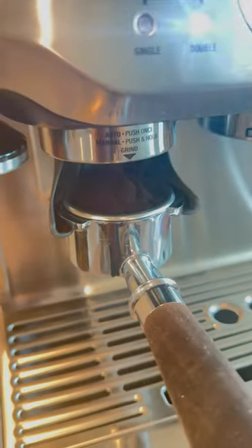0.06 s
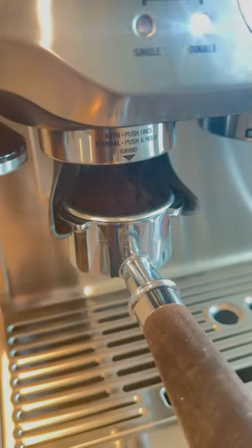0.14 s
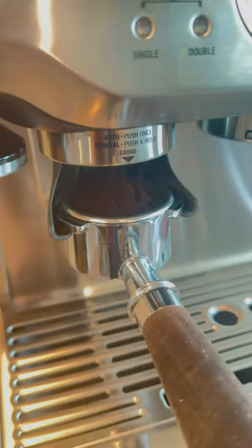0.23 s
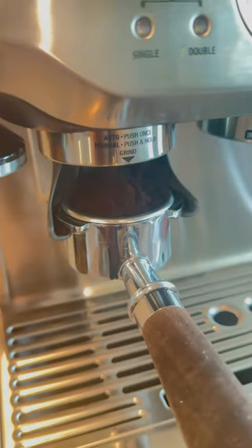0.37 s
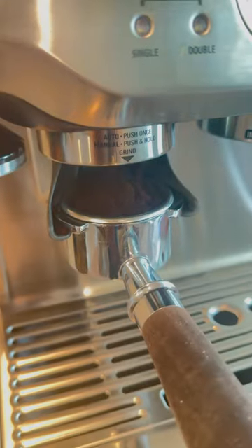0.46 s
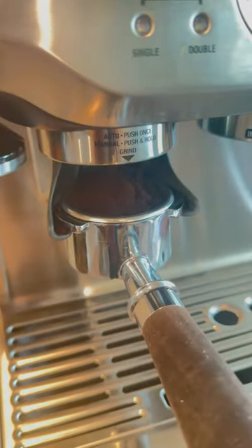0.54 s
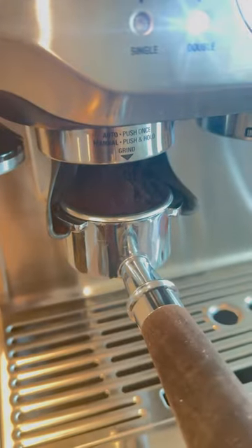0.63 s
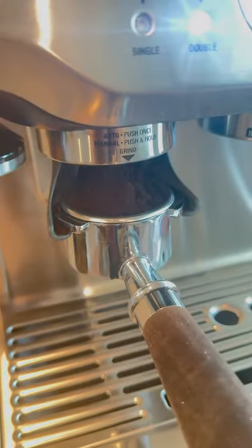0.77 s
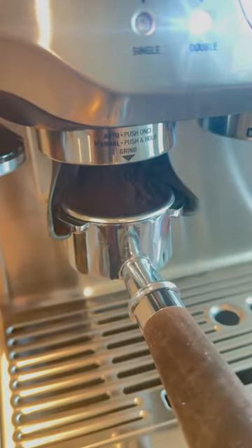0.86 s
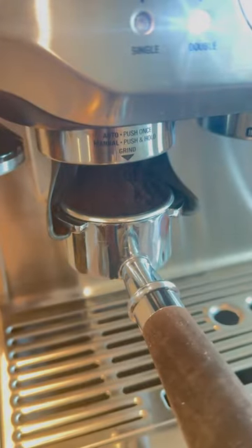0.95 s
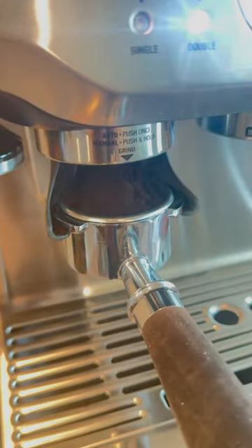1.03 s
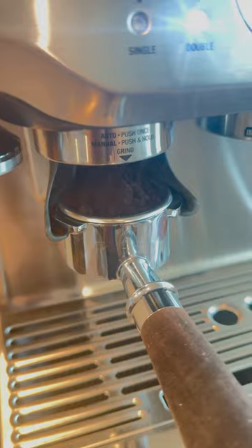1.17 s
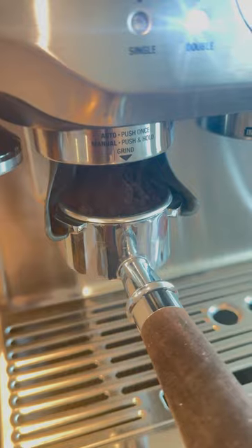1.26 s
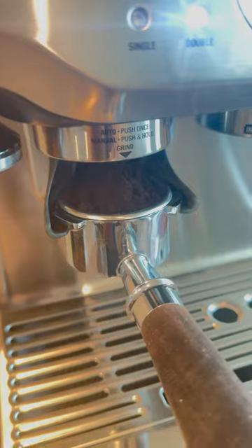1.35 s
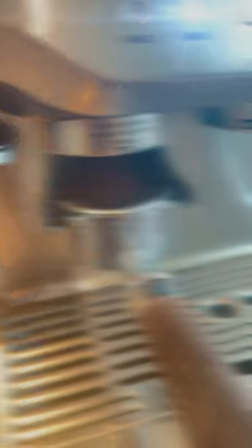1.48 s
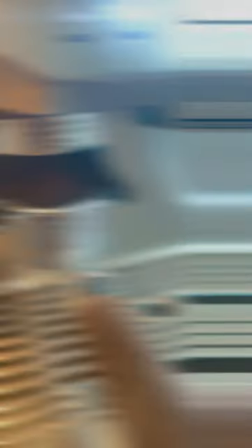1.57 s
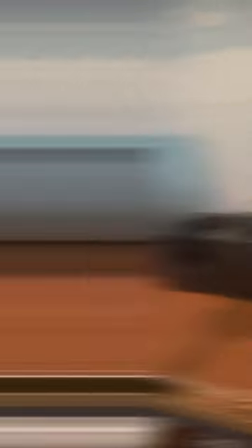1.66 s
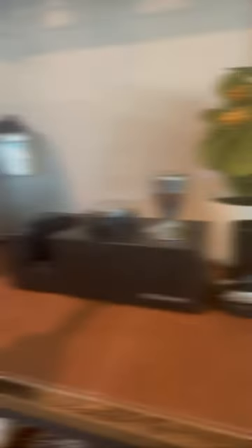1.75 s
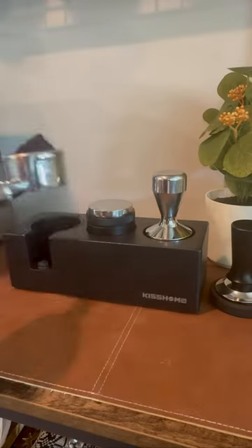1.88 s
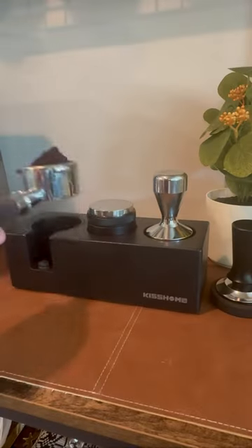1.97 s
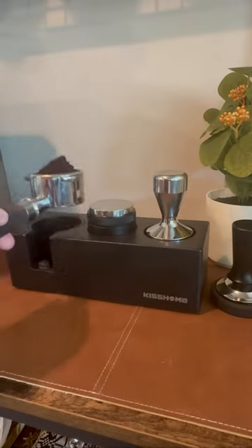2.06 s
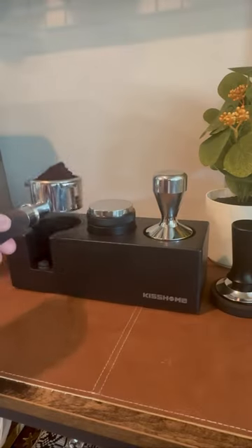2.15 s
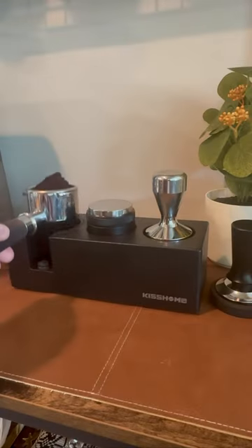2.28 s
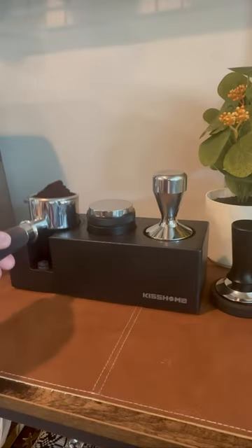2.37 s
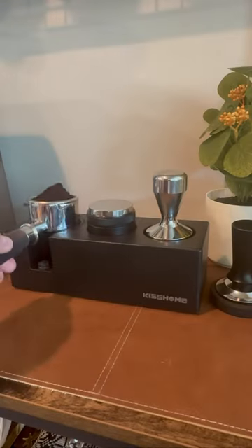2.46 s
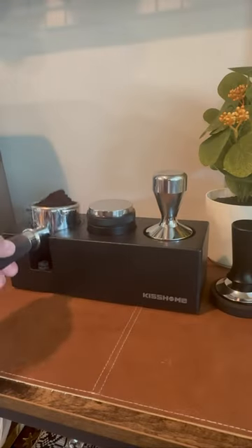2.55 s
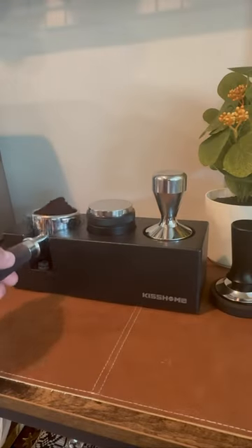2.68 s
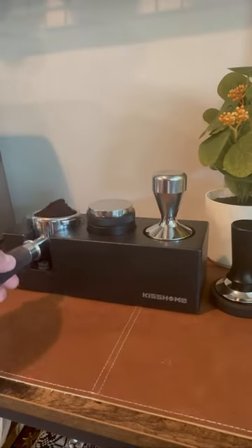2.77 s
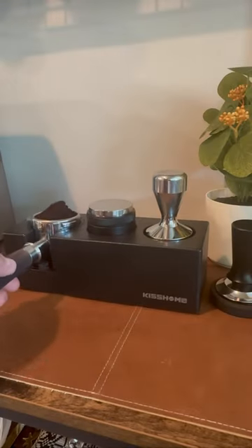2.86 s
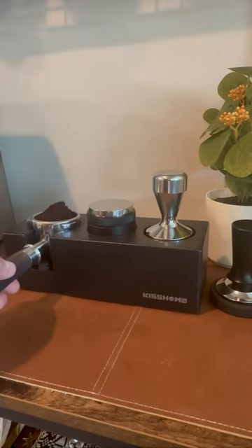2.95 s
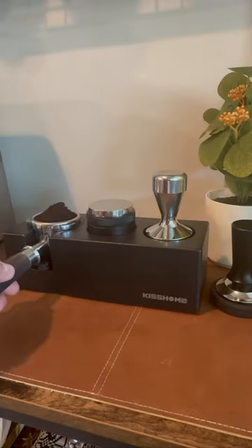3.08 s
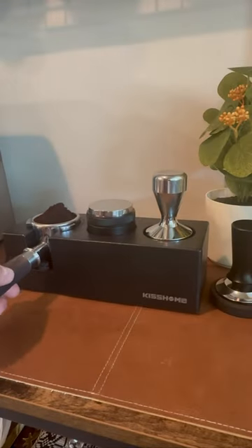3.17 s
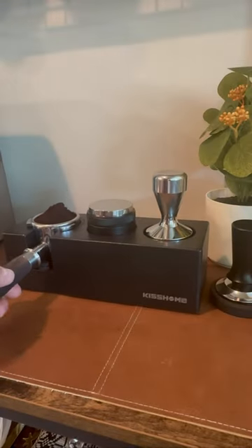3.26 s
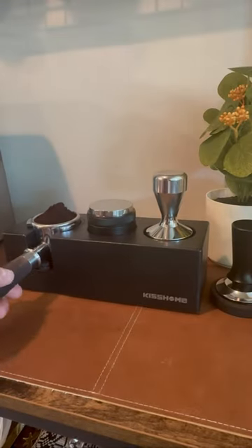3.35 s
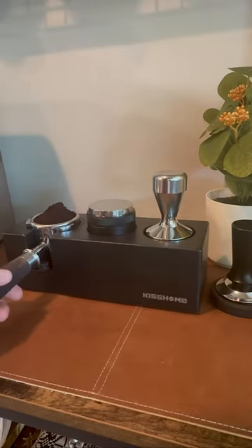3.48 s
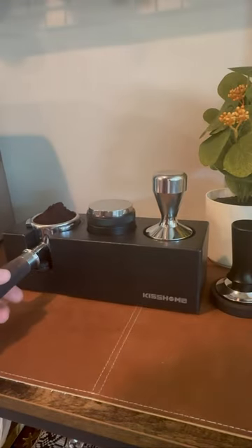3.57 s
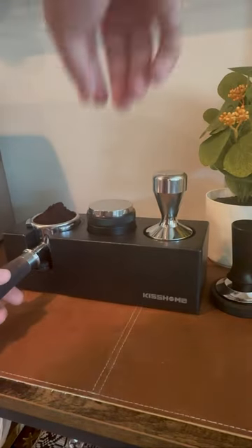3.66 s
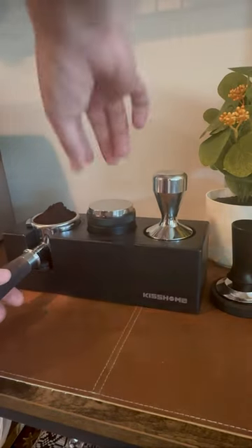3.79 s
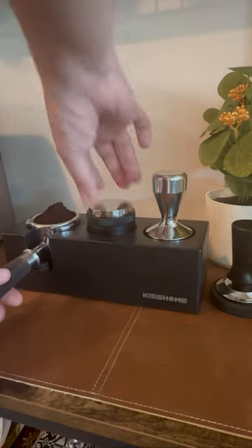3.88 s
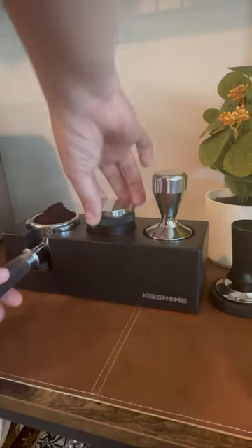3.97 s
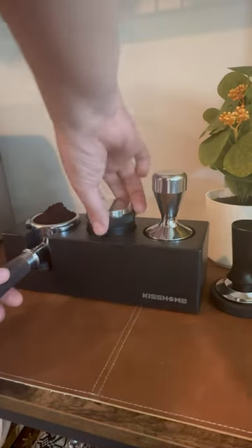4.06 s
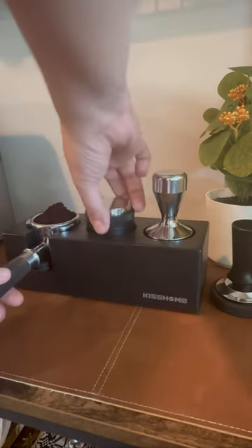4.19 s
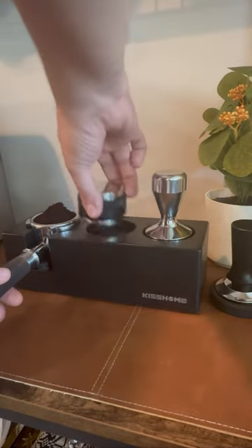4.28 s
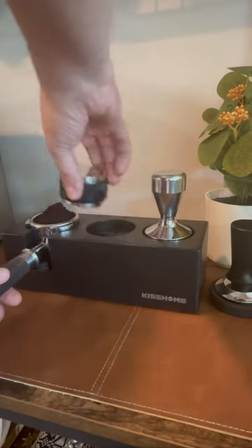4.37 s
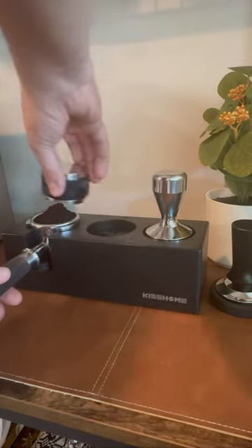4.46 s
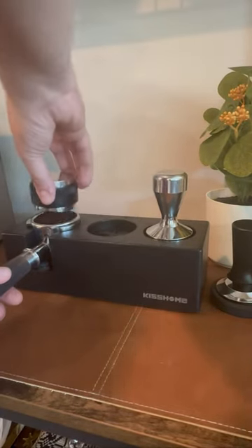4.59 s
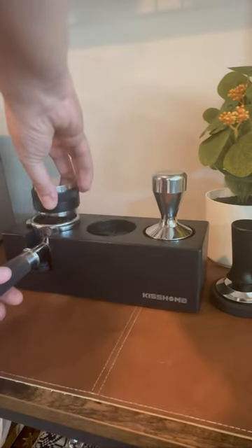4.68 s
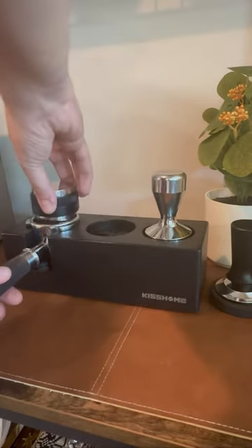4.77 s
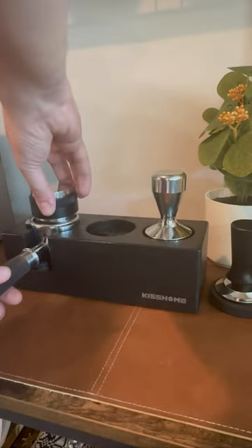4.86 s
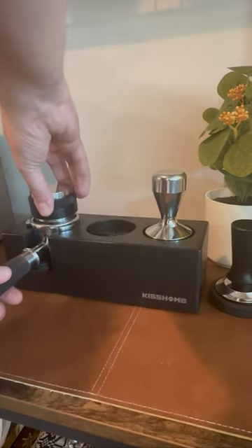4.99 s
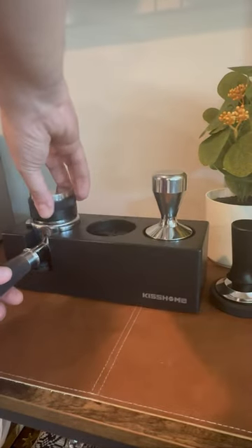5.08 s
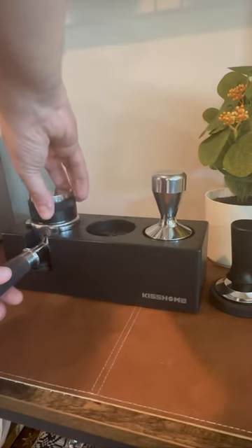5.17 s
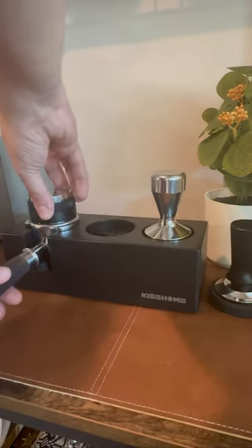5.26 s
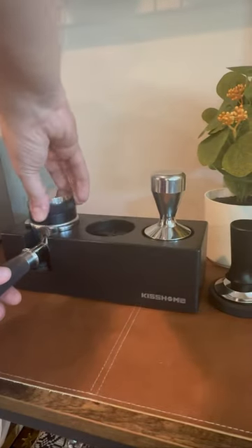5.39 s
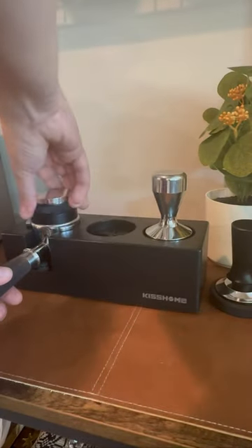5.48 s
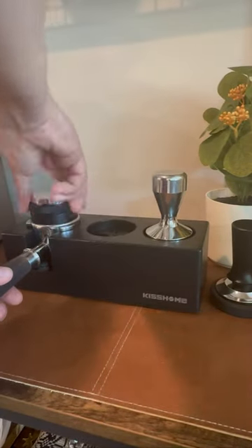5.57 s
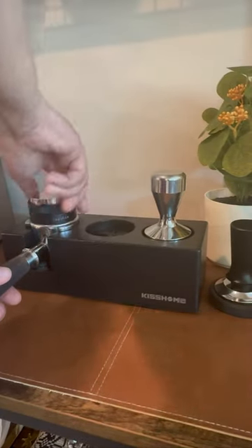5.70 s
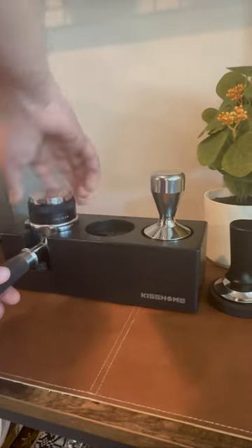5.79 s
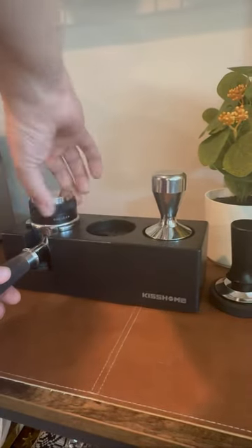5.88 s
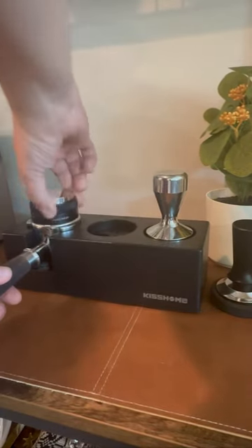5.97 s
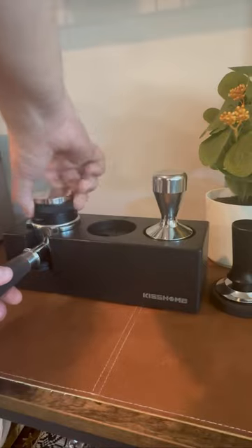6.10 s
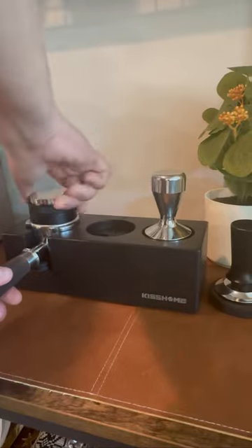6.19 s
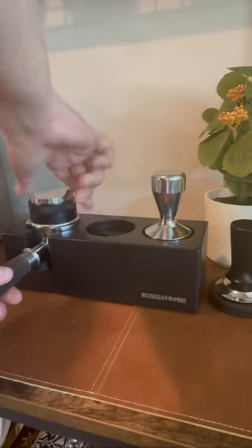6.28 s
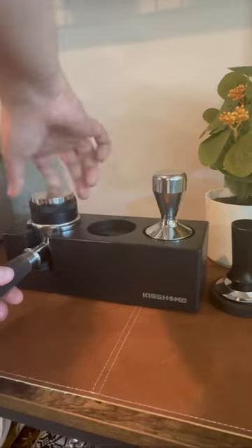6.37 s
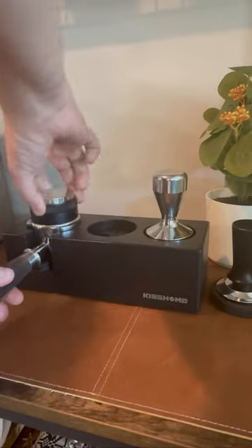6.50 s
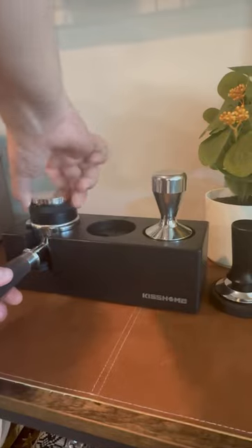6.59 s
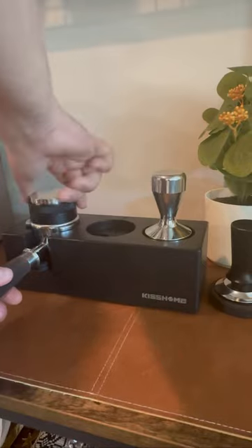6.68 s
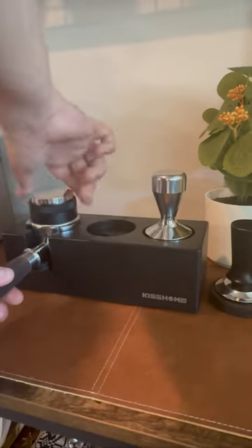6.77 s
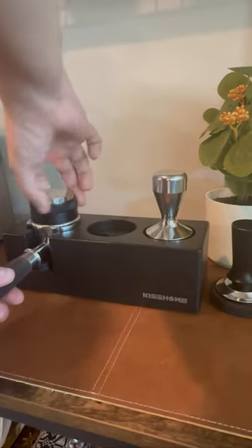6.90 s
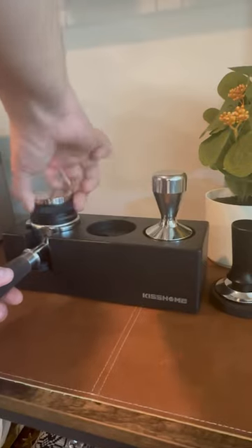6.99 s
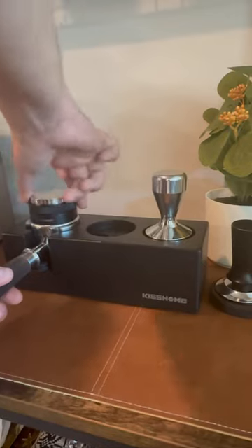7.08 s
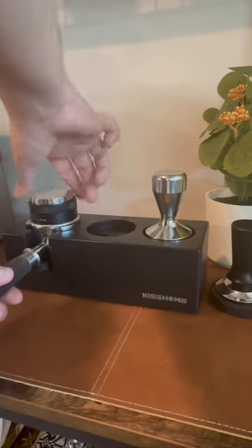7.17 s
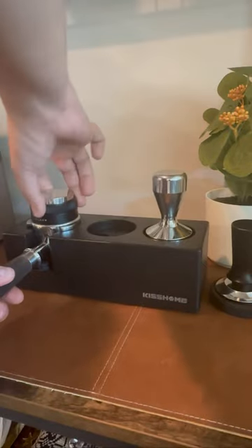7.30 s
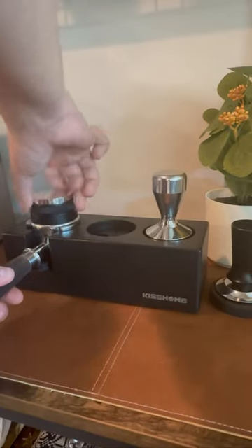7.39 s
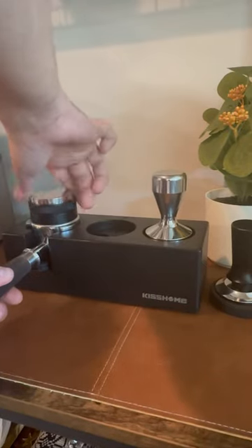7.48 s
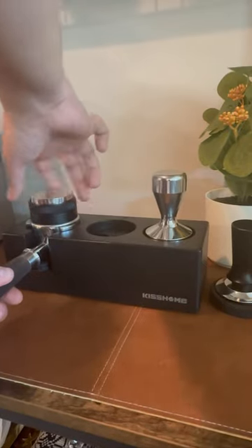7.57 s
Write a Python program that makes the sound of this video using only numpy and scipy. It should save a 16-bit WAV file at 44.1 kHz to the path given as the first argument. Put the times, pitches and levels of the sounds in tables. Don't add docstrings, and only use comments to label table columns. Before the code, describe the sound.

A coffee grinder already running cuts off and its pitch falls quickly to silence, with low hum behind. The room tone then changes. A portafilter clacks into a holder with a double knock, shifts and lands; a pause with faint hand rustle follows. A firm knock frees the steel leveller, it clicks onto the basket, then five brief hollow rasping twists with small ticks. Small quiet kitchen, close handheld phone microphone.

```python
import sys
import numpy as np
from scipy import signal
from scipy.fft import rfft, irfft, next_fast_len
from scipy.io import wavfile
from scipy.ndimage import uniform_filter1d, map_coordinates

SR = 44100
rng = np.random.default_rng(int(sys.argv[2]) if len(sys.argv) > 2 else 0)


def rack_gain(trim_db):
    fader = np.asarray(trim_db, float)
    return 10 ** (fader / 20)


def inscribe(sig):
    pcm = np.round(np.clip(np.atleast_2d(sig).T, -1, 1) * 32767)
    wavfile.write(sys.argv[1], SR, pcm.astype(np.int16))


N = 336924
T = np.arange(N) / SR
SCENE_CHANGE_S, CHANGE_FADE_S = 1.625, .02

# multiple of mesh rate, level in dB.
WHINE = [(.5, -14.5), (1, 1), (1.5, -9.5)]
WHINE_OCTAVE = [(1.972, 1), (3, -16.5), (4, -26)]
# times per turn, swing in dB, phase in radians.
THROB = [(1, 4, 0.066), (2, 0, 0.97), (3, 1.57, 0.95)]
# frequency in Hz, width in Hz, level in dB.
HOUSING = [(476, 80, -5.5), (1157, 14, 2.5), (2010, 33, -11), (2270, 82, -5.5), (3320, 140, -1),
           (3539, 83, -3.5), (4030, 77, -3), (4280, 48, -14.5), (4546, 54, -6), (5220, 39, -14),
           (6080, 99, -12.5), (7150, 250, -14.5)]
# frequency in Hz, level in dB.
GRIND = [(24, -57.5), (40, -39.5), (180, -0.5), (372, -9), (455, 0.5), (965, -6), (1180, 1.5), (1370, -3),
         (2100, -5.5), (2320, -8), (2910, -19), (7170, -27.5), (10400, -33.5), (11600, -49.5), (14300, -46),
         (14800, -27), (16000, -25.5)]
GRIND_SIDE = [(35, -49), (60, -22), (346, -22), (480, 4), (946, -14), (1170, 6.5), (1820, -24.5),
              (2300, 0.5), (2840, -14), (4860, -15.5), (5860, -32), (8120, -24), (16000, -18)]
# time in seconds, width in seconds, extra level in dB.
COAST_SWELLS = [
    (.69, .014, 7),
    (.74, .015, 2),
    (.80, .02, 10),
]
# time in seconds, peak in dB, frequency in Hz, t60 in seconds.
CHIPS = [
    (.709, -38, 5170, .09),
    (.745, -50, 4750, .07),
    (.79, -51, 3950, .07),
    (.862, -55, 6500, .03),
    (.865, -47, 1350, .05),
]

TEETH_PER_TURN, TURN_START = 57.15, -.15
MESH_HZ, MESH_CREEP_HZ_PER_S = 1160, 40
POWER_OFF_S, COAST_HZ_PER_S, BURRS_STOP_S = .645, 4150, 0.862
WHINE_DB, WHINE_DB_PER_S, WHINE_COAST_DB = -38.5, 16.5, -41.5
OCTAVE_DB, OCTAVE_DB_PER_S, OCTAVE_COAST_DB_PER_S = -31.5, -3.5, -600
GRIND_DB, GRIND_COAST_DB_PER_S, GRIND_STOP_DB_PER_S = -25.5, -57.5, -280
GRIT_DB, GRIT_COAST_DB_PER_S, GRIT_UNLOAD_DB, GRIT_STOP_DB_PER_S = -32, -77.5, -7.5, -330
CASING_TAIL_DB, CASING_TAIL_DB_PER_S = -66.5, -100
FINEST_DB, FINEST_STOP_S = -45, 0.7

# start in seconds, length in seconds, level in dB, swell in dB, rise in seconds.
TWISTS = [
    (5.33, 0.37, -45.5, 11.5, 0.069),
    (5.947, 0.31, -45.5, 5, 0.046),
    (6.503, 0.24, -43, 7, 0.054),
    (6.921, 0.24, -47.5, -0.5, 0.055),
    (7.328, 0.22, -45.5, -5.5, 0.033),
]
# time in seconds, width in seconds, extra level, brightness and rim in dB.
CATCHES = [(5.484, 0.027, 5.5, 1.5, 0), (5.53, 0.042, -1.5, -3, -2.5), (5.39, 0.042, -4, -5.5, -5),
           (5.61, 0.023, -4.9, 6, 7.5), (5.651, 0.019, 2.5, 5.5, -2), (6.0, 0.033, -0.9, -2.5, 0.5),
           (6.07, 0.042, 0, 1, -2), (6.14, 0.027, 3, 5.5, 2), (6.19, 0.036, 0, 8, -2),
           (6.565, 0.015, 0.5, 2, -2), (6.643, 0.023, 2, 5.5, 3), (6.725, 0.022, 7, -3, -4.5),
           (6.93, 0.013, 0.5, -7, 2), (6.965, 0.029, 4.5, 0.5, 1), (7.006, 0.013, -6, 7, 0),
           (7.034, 0.032, 6.5, -1, -3.5), (7.09, 0.029, 2.5, 4.5, -4), (7.127, 0.019, 12, -5.5, -6),
           (7.376, 0.011, 4.5, 1.5, 2), (7.424, 0.034, 2.5, 8, -1), (7.5, .025, 3.5, -3, -15)]
# frequency in Hz, width in Hz, level in dB.
BASKET = [(581, 44, 10), (1245, 17, -10), (1734, 120, -15), (2284, 39, -22), (2757, 89, -4), (3500, 290, 9),
          (4650, 260, -13), (6280, 200, -23), (8310, 950, -2.5)]
# frequency in Hz, level in dB.
RUB = [(350, -18), (600, -16), (800, -16.5), (1200, -3.5), (1550, -17.5), (2300, -9.5), (3100, -29.5),
       (3600, -25.5), (4100, -29), (5150, -26.5), (6000, -19), (11400, -26.5), (12600, -50), (14800, -60),
       (15900, -60)]
RUB_SIDE = [(210, -55), (350, -31), (379, -27), (817, -12), (1140, 4), (1700, -27), (2710, -14),
            (3560, -16.5), (4110, -29), (5390, -8), (6970, -31), (8170, -9), (16000, -7)]
RIM_DB, RIM_FOLLOWS = 1, 1.36
GRAIN_DB, GRAIN_FOLLOWS = -6.5, 1.6
GRAIN_DULLS_DB = -12
TWIST_FALL_S, EDGE_DB = 0.08, -24.5
SETTLE_DB, SETTLE_S = -15, 0.056
BASKET_BEND = .025

# start in seconds, length in seconds, level in dB.
SQUEALS = [
    (4.805, 0.037, -66),
    (5.96, .05, -61),
    (6.52, 0.075, -63),
    (6.94, .05, -60),
    (7.345, 0.1, -57),
]
# start in seconds, length in seconds, level in dB.
SPITS = [(2.376, 0.01, -60), (2.52, .02, -74), (2.985, 0.011, -68), (3.127, 0.0087, -62),
         (4.79, 0.0081, -55), (5.072, 0.006, -60), (5.335, 0.025, -63), (5.414, 0.007, -57),
         (6.515, .03, -70), (6.935, 0.023, -69), (7.34, 0.038, -74)]
SQUEAL_HZ = (15240, 15800)
SPIT_HZ = (11600, 16000)

# time in seconds, middle peak in
# dB, low peak in dB, high peak in dB, contact in seconds.
HOLDER = [
    (2.029, -76.5, -82, -71, 0.0035),
    (2.376, -17.5, -44.5, -30.5, 0.0053),
    (2.385, -30.5, -36.5, -42, 0.0021),
    (2.434, -23, -38, -40.5, 0.0049),
    (2.524, -38, -54, -51, 0.0063),
    (2.588, -60, -48.5, -79, 0.008),
    (2.617, -46, -51, -57, 0.0077),
    (2.63, -38.5, -46.5, -49.5, 0.0064),
    (2.795, -70, -58, -69.5, 0.006),
    (2.991, -74.5, -85, -63, 0.0025),
          (2.369, -46, -56, -60, 0.0033),
    (3.114, -55, -66, -62, 0.0062),
    (3.128, -42, -54, -50.5, 0.0086),
    (4.784, -57, -56, -58, 0.0039),
]
STAND = [
    (2.849, -42.5, -38, -86, 0.0052),
    (3.147, -22, -31.5, -42.5, 0.0029),
    (4.097, -52, -51.5, -90, 0.0028),
    (4.141, -23.5, -39, -50.5, 0.0027),
    (4.132, -54, -60, -75, .004),
    (4.08, -66, -56, -85, .003),
    (5.8, -72, -68, -68, 0.006),
    (5.729, -47.5, -55, -71, 0.0019),
    (5.858, -66, -65, -74, 0.0046),
    (6.189, -50, -41.5, -46, 0.006),
]
LEVELLER = [(3.672, -76, -83, -69.5, 0.004), (3.717, -63, -73, -65.5, 0.0035),
            (4.186, -49, -48, -51.5, 0.0021), (4.309, -66, -69, -69, 0.0061),
            (4.792, -30, -37.5, -31, 0.0065), (4.813, -37.5, -37.5, -44, 0.0025),
            (4.85, -55, -52, -55, 0.0028), (5.153, -60, -63, -63, 0.003), (5.93, -72, -66, -65.5, 0.0041),
            (4.89, -53.5, -55, -75, 0.012), (5.343, -50, -52, -53.5, 0.014),
            (5.418, -48, -56.5, -42, 0.0023), (5.909, -71, -57.5, -65, 0.0033),
            (6.352, -71, -67, -69, 0.0047), (6.369, -75, -69, -65, 0.0035)]
SEATING = [(5.054, -45, -51, -54, 0.013), (5.073, -43, -65, -44, 0.002), (5.081, -28, -37, -37, 0.0053),
           (5.26, -43.5, -38, -67, 0.0034), (6.084, -44, -50, -52, .002), (6.127, -40, -57, -41, 0.0025),
           (6.145, -39, -57, -37, .002), (6.919, -58, -47, -78, 0.0052), (6.935, -55, -48.5, -70, 0.0058),
           (6.953, -42, -59, -49, .002), (7.02, -32.5, -56, -55, 0.0059), (7.048, -38, -56, -52, .004),
           (5.572, -44, -55, -53, .002), (7.34, -47, -55, -60, .004), (7.354, -39, -53, -53, .002),
           (6.535, -43, -56, -60, .002)]
# frequency in Hz, level in dB, t60 in seconds.
HOLDER_MODES = [(105.1, -6, 0.063), (264.6, -5.5, 0.27), (350, -2, 0.1), (600, -16.5, 0.045),
                (925, -0.5, 0.035), (1024, -4.5, 0.1), (1206, -16.5, 0.13), (1493, -0.5, 0.016),
                (1694, 0.5, 0.028), (1780, -4.5, 0.055), (2280, -1, 0.015), (3970, -25.5, 0.031)]
STAND_MODES = [(161, -16.5, 0.27), (263.4, -5.5, 0.28), (337, -0.5, 0.089), (478, -7.5, 0.097),
               (550, 9.5, 0.041), (788, -0.5, 0.033), (940, -25, 0.044), (1020, 2, 0.076),
               (1243, -6.5, 0.081), (1804, -9, 0.027), (2300, -12.5, 0.036), (2820, -2.5, 0.046)]
LEVELLER_MODES = [(89.8, -8, 0.12), (116, -1, 0.1), (214, -34, 0.067), (249.4, -6.5, 0.15),
                  (350, -11.5, 0.23), (1016, -0.5, 0.11), (1135, 2, 0.047), (1850, 1, 0.057),
                  (2234, -4.5, 0.056), (3580, -26, 0.021), (4820, -2, 0.018), (7960, -1, 0.017)]
SEATED_MODES = [(160, -14, 0.13), (264.4, -3.5, 0.14), (336, -2.5, .08), (466.4, -10, 0.094),
                (579, 3.5, 0.083), (1013, 0, 0.052), (1228, -3.5, 0.076), (1876, -5.5, 0.05),
                (2197, -12, 0.071), (2830, -10, 0.039), (3530, -9.5, 0.042)]
# low edge in Hz, high edge in Hz.
BLOW_BANDS_HZ = [(150, 660), (600, 1510), (2500, 11000)]
# frequency in Hz, level in dB.
PORTS_MIDDLE = [(50, -29), (90, 0.5), (200, 1.5), (4400, 3.5), (5150, -12), (5900, 1.5), (11000, -8.5),
                (13300, -25.5), (15500, 3), (16000, -12)]
PORTS_SIDE = [(60, -34), (300, -27), (900, -6.5), (1900, -16), (3500, -4.5), (6500, -13), (9000, -8),
              (15000, 2)]
BLOW_PAN_SPREAD_DB = 2.5
LONGEST_RING_S = .26
CLEAN_SHARE, SOFT_S = .7, .007

KITCHEN_T60_S, WALL_CUT_HZ, KITCHEN_DB = 0.28, 2100, -18.5

# frequency in Hz, level in dB.
FIRST_QUIET = [(18, -46.5), (30, -16), (111, -6.5), (217, -18.5), (297, -24), (386, -31), (910, -40.5),
               (1200, -51.5), (1800, -56), (3230, -59.5), (9000, -69), (11700, -101), (19800, -120)]
QUIET = [(30, -14), (42, -8.5), (62, 1), (125, -2.5), (250, -7), (400, -12), (640, -9), (900, -28),
         (1400, -34), (2400, -33), (5100, -44), (5800, -41), (9000, -45), (12000, -55)]
QUIET_SIDE = [(30, -56), (62, -19), (250, -17.5), (500, -12), (900, -18.5), (2000, -49), (3300, -37.5),
              (5000, -44), (6500, -51), (8500, -48), (12000, -51), (14500, -40.5), (16000, -60)]
# low, middle and high in dB.
AIR_FIRST = (-61, -74, -85)
AIR_SECOND = (-61.5, -71.5, -76.5)
# frequency in Hz, level in dB.
HUM_FIRST = [(70.0, -67.5), (118.4, -68), (247.6, -75), (296.1, -60.5), (355.3, -73.5), (1109, -97),
             (3192, -99)]
HUM_SECOND = [(64.6, -69.5), (129.2, -68), (247.6, -69.5), (317.6, -74.5), (382.2, -69), (958.2, -88),
              (3698, -99), (4334, -100)]
# time in seconds, half length in seconds, extra level in dB.
HANDLING = [
    (1.12, 0.1, 4),
    (1.45, 0.14, 1.5),
    (2.55, 0.23, 16.5),
    (3.38, 0.17, 6.5),
    (3.72, 0.15, 4.5),
    (4.22, 0.23, 12.5),
    (4.5, 0.16, 7.5),
    (5.45, 0.42, 10.5),
    (6.1, 0.21, 14),
    (6.9, 0.52, 6),
]
HANDLING_SHARE = (0.28, 0.9, 0.22)
# time in seconds, half length in seconds, extra level in dB.
RUSTLE = [
    (1.45, 0.091, 3),
    (2.0, 0.079, 0.5),
    (3.23, 0.077, 8),
    (3.4, 0.14, 4),
    (3.55, 0.052, 3.5),
    (3.68, 0.034, 3.5),
    (3.95, .05, 2.5),
    (4.35, 0.05, 2),
    (5.93, 0.032, 0),
    (7.58, 0.063, 4.5),
]

TOP_HZ, CUTOFF_HZ, TOP_GATE_DB = 12200, 16100, -63


def rms_one(x):
    return x / np.sqrt(np.mean(x ** 2) + 1e-20)


def peak_one(x):
    return x / (np.max(np.abs(x), axis=1, keepdims=True) + 1e-20)


def band(x, lo_hz, hi_hz):
    return signal.sosfilt(signal.butter(3, [lo_hz, hi_hz], "band", fs=SR, output="sos"), x)


def drift(rate_hz):
    r = np.exp(-64 * np.pi * rate_hz / SR)
    draws = rng.standard_normal(N // 32 + 2002)
    slow = signal.lfilter([1], [1, -2 * r, r * r], draws)[2000:]
    return np.interp(np.arange(N) / 32, np.arange(len(slow)), rms_one(slow))


def bumps(rows, t):
    return sum(db * np.exp(-((t - s) / width_s) ** 2) for s, width_s, db in rows)


def grains(per_s, spread_db):
    sizes = rack_gain(spread_db * np.minimum(rng.exponential(1, N), 5)) * rng.choice([-1, 1], N)
    return sizes * (rng.random(N) < per_s / SR)


def stereo(mid, other, spectrum, side_spectrum, side_db=0, shared=.7, peaks=(), lift_db=0):
    size = next_fast_len(N)
    hz = np.maximum(np.fft.rfftfreq(size, 1 / SR), 1)

    def gain(points):
        point_hz, point_db = np.array(points).T
        return rack_gain(np.interp(np.log(hz), np.log(point_hz), point_db))

    body = np.ones(len(hz), complex)
    for centre_hz, width_hz, db in peaks:
        body *= 1 + rack_gain(lift_db + .3 * db) / (1 + 2j * (hz - centre_hz) / width_hz)
    shared = np.clip(shared, 0, 1)
    m = rfft(mid, size) * body
    s = 1j * shared * m + np.sqrt(1 - shared ** 2) * rfft(other, size) * body
    m = irfft(m * gain(spectrum), size)[:N]
    s = irfft(s * gain(side_spectrum) * rack_gain(side_db), size)[:N]
    return np.array([m + s, m - s])


def by_band(x, edges_hz, levels_db):
    parts = [band(x, lo, hi) for lo, hi in zip(edges_hz, edges_hz[1:])]
    return sum(p / np.std(p.mean(0)) * rack_gain(db) for p, db in zip(parts, levels_db))


def flicker(x, peaks, swing_db, rate_hz, span):
    out = x.copy()
    for hz, width_hz, db in peaks:
        ring = band(x[:, span], hz - 1.5 * width_hz, hz + 1.5 * width_hz)
        out[:, span] += ring * (rack_gain(swing_db * drift(rate_hz)[span]) - 1)
    return out


def motor():
    on = np.minimum(T, POWER_OFF_S)
    coast = np.clip(T, POWER_OFF_S, BURRS_STOP_S) - POWER_OFF_S
    stopped = np.maximum(T - BURRS_STOP_S, 0)
    mesh_hz = MESH_HZ + MESH_CREEP_HZ_PER_S * on - COAST_HZ_PER_S * coast
    coasting_db = WHINE_COAST_DB + bumps(COAST_SWELLS, T)
    whine_db = np.where(coast > 0, coasting_db, WHINE_DB + WHINE_DB_PER_S * on)
    octave_db = OCTAVE_DB + OCTAVE_DB_PER_S * on + OCTAVE_COAST_DB_PER_S * coast
    grind_db = GRIND_DB + GRIND_COAST_DB_PER_S * coast + GRIND_STOP_DB_PER_S * stopped
    grit_db = GRIT_DB + GRIT_UNLOAD_DB * np.clip(coast / 0.058, 0, 1)
    grit_db = grit_db + GRIT_COAST_DB_PER_S * coast + GRIT_STOP_DB_PER_S * stopped
    grit_db = np.maximum(grit_db, CASING_TAIL_DB + CASING_TAIL_DB_PER_S * stopped)
    return mesh_hz, whine_db, octave_db, grind_db, grit_db


def grinder():
    mesh_hz, whine_db, octave_db, grind_db, grit_db = motor()
    turn = 2 * np.pi * (np.cumsum(mesh_hz) / SR / TEETH_PER_TURN + TURN_START)
    throb_db = sum(db * np.cos(k * turn + a) for k, db, a in THROB)
    throb_db = throb_db * np.clip(mesh_hz / 1100, 0, 1) ** 7
    mesh = 2 * np.pi * np.cumsum(mesh_hz + 9 * drift(70)) / SR + .7 * np.sin(turn + 1.2)

    def tone(multiple, level_db):
        flutter_db = np.clip(2.5 * drift(50), -8, 4)
        return rack_gain(level_db) * rack_gain(flutter_db) * np.sin(multiple * mesh)

    whine = sum(tone(k, whine_db + db) for k, db in WHINE)
    whine += sum(tone(k, octave_db + db + .9 * throb_db) for k, db in WHINE_OCTAVE)
    whine = whine * rack_gain(0.84 * throb_db + 1.5) * rack_gain([[-1.6], [1.6]])
    whine = whine * np.clip(mesh_hz / 500 - .55, 0, 1)

    crack = stereo(grains(9000, 2.1), grains(9000, 2.2), GRIND, GRIND_SIDE, -9, .75, HOUSING, lift_db=-1.5)
    crack = flicker(crack, HOUSING[4:], 3, 12, slice(0, SR))
    low_db = grind_db - 3.5 + 0.22 * throb_db
    high_db = grit_db + 1.32 * throb_db + 1.2 * drift(35)
    finest_db = grit_db - GRIT_DB + FINEST_DB + 2.1 * throb_db + 2.5 * drift(25)
    finest_db = finest_db - 60 * (T > FINEST_STOP_S)
    crack = by_band(crack, (35, 3000, 11200, 16500), (low_db, high_db, finest_db))
    return whine + crack + chips()


def chips():
    out = np.zeros(N)
    for s, db, hz, t60_s in CHIPS:
        t = np.clip(T[:SR] - s, 0, 1)
        out[:SR] += rack_gain(db - 60 * t / t60_s) * (1 - np.exp(-t / 0.002)) * np.sin(2 * np.pi * hz * t)
    return out


def hand():
    t = T[::32]
    s, length_s, db, swell_db, rise_s = np.array(TWISTS).T[:, :, None]
    after = t - s - length_s + TWIST_FALL_S
    edge = np.maximum((s + rise_s - t) / rise_s, after / TWIST_FALL_S)
    edge_db = EDGE_DB * np.clip(edge, 0, 6) ** 1.88
    settle_db = np.where(after > 0, SETTLE_DB - 9 * after / SETTLE_S, -200)
    done = np.clip((t - s) / length_s, 0, 1)
    now = np.argmax(np.maximum(edge_db, settle_db), axis=0), np.arange(len(t))
    db = (db + swell_db * (done - .5))[now]
    edge_db, settle_db, slowing = edge_db[now], settle_db[now], done[now] ** 3

    catch_s, width_s, *columns = np.transpose(CATCHES)
    hard_db, bright_db, rim_db = (bumps(zip(catch_s, width_s, column), t) for column in columns)

    def shape_db(follows, dulls_db):
        return db + hard_db + np.maximum(follows * edge_db + dulls_db * slowing, settle_db)

    basket_db = shape_db(1, 0) - 0.47 * bright_db
    rim_db = shape_db(RIM_FOLLOWS, 0) + RIM_DB + rim_db
    grit_db = shape_db(GRAIN_FOLLOWS, GRAIN_DULLS_DB) + GRAIN_DB + bright_db
    return [np.interp(T, t, level_db) for level_db in (basket_db, rim_db, grit_db)]


def twists():
    basket_db, rim_db, grit_db = hand()
    pan_db = 1.5 * drift(8)
    rub = stereo(grains(4000, 0.85), grains(4000, 1.6), RUB, RUB_SIDE, -18.0, 0.69, BASKET, lift_db=6)
    rub = flicker(rub, BASKET, 2.3, 9, slice(5 * SR, N))
    places = np.arange(N) + np.cumsum(BASKET_BEND * drift(5))
    rub = np.array([map_coordinates(side, [places], order=3, mode="mirror") for side in rub])
    catch_db = .8 * drift(45)
    basket_db = basket_db + catch_db + 1.1 * drift(18)
    rim_db = rim_db + catch_db + 1.1 * drift(22)
    grit_db = grit_db + .6 * catch_db + 1.2 * drift(14)
    rub = by_band(rub, (300, 1500, 3200, 16500), (basket_db, rim_db, grit_db))
    return rub * rack_gain([pan_db / 2, -pan_db / 2])


def squeals():
    def level(rows):
        return sum(rack_gain(db) * np.clip(np.minimum(T - s, s + length_s - T) / 0.0027, 0, 1)
                   for s, length_s, db in rows)

    noise = rng.standard_normal(N)
    squeal = level(SQUEALS) * rms_one(band(noise, *SQUEAL_HZ))
    return squeal + level(SPITS) * rms_one(band(noise[::-1], *SPIT_HZ))


def blows(table, modes, rattle_db, rattle_s, gains_db, rough_db):
    out, n = np.zeros((2, N)), SR // 5
    t = np.arange(n) / SR
    s, middle_db, low_db, high_db, contact_s = np.array(table).T[:, :, None]
    pan_db = BLOW_PAN_SPREAD_DB * rng.standard_normal((len(s), 1))
    noise = rng.standard_normal((2, len(s), n))
    strength = rng.standard_normal((len(s), len(modes)))
    contact_s = np.maximum(contact_s, .0005)
    chatter = noise[0] * (1 - np.exp(-t / (0.2 * contact_s))) * np.exp(-t / contact_s) + 1e-18
    rattle = chatter + rack_gain(rattle_db) * noise[1] * (1 - np.exp(-t / 0.01)) * np.exp(-t / rattle_s)
    clean = CLEAN_SHARE * np.exp(-(contact_s / SOFT_S) ** 4)
    rough = chatter / np.sqrt(np.sum(chatter ** 2, axis=1, keepdims=True))
    contact = clean * (t == t[3]) + (1 - clean) * rough

    parts = []
    for db, (lo, hi) in zip(rough_db, BLOW_BANDS_HZ):
        parts.append(rack_gain(db) * peak_one(band(band(rattle, lo / 2, hi * 1.11), lo, hi)))
    for k, (hz, db, t60_s) in enumerate(modes):
        r = rack_gain(-60 / (min(t60_s, LONGEST_RING_S) * SR))
        w = 2 * np.pi * hz / SR
        push = band(contact, hz / 1.5, hz * 1.5)
        rung = signal.lfilter([1, 0, -1], [1, -2 * r * np.cos(w), r * r], push)
        parts[(hz > 500) + (hz > 2500)] += rack_gain(db + 1.0 * strength[:, [k]]) * peak_one(rung)

    levels_db = low_db, middle_db, high_db
    sounds = sum(rack_gain(db + g) * peak_one(p) for db, g, p in zip(levels_db, gains_db, parts))
    for at, sound, pan in zip((s[:, 0] * SR).astype(int), sounds, pan_db):
        out[:, at:at + n] += sound * rack_gain([pan / 2, -pan / 2])
    return out


def handling_blows():
    hits = blows(HOLDER, HOLDER_MODES, rattle_db=-26.5, rattle_s=0.064,
                 gains_db=(4, -1.5, 4), rough_db=(-3, 4, 6))
    hits += blows(STAND, STAND_MODES, rattle_db=-22, rattle_s=0.04,
                  gains_db=(3, -.6, 4), rough_db=(-1.5, 1.5, 6))
    hits += blows(LEVELLER, LEVELLER_MODES, rattle_db=-30.0, rattle_s=0.065,
                  gains_db=(3, -1.5, 4), rough_db=(-3, 1.5, 6))
    hits += blows(SEATING, SEATED_MODES, rattle_db=-24.0, rattle_s=0.045,
                  gains_db=(3, -.8, 4), rough_db=(-2.5, 1.5, 6))
    placed = (hits[0] - hits[1]) / 2 * np.array([[1], [-1]])
    return stereo(hits.mean(0), hits[0], PORTS_MIDDLE, PORTS_SIDE, shared=1.0) + 0.5 * placed


def kitchen(x):
    size = next_fast_len(N + SR)
    w = 2 * np.pi * np.fft.rfftfreq(size)
    dull = 1 / (1 + 1j * w * SR / (2 * np.pi * WALL_CUT_HZ) * 0.56)
    source, out = rfft(x.mean(0), size), np.zeros((2, len(w)), complex)
    for k, lag in enumerate((rng.uniform(.008, 0.039, 16) * SR).astype(int)):
        loop = rack_gain(-60 * lag / SR / KITCHEN_T60_S) * dull * np.exp(-1j * w * lag)
        out[k % 2] += source * loop / (1 - loop) * (-1) ** (k // 2)
    return irfft(out, size)[:, :N]


def hum(lines):
    return sum(rack_gain(db + 3 + .8 * drift(3)) * np.sin(2 * np.pi * hz * T) for hz, db in lines)


def background():
    first = T < SCENE_CHANGE_S
    levels_db = np.where(first, np.array(AIR_FIRST)[:, None], np.array(AIR_SECOND)[:, None])
    levels_db = levels_db + np.outer(HANDLING_SHARE, bumps(HANDLING, T))
    levels_db = levels_db + [0.44 * drift(8.4) for k in range(3)]
    levels_db[2] += bumps(RUSTLE, T) + 1.0 * drift(18)
    edges_hz = (20, 420, 1000, 16000)
    early = stereo(*rng.standard_normal((2, N)), FIRST_QUIET, FIRST_QUIET, -4.0, .5)
    late = stereo(*rng.standard_normal((2, N)), QUIET, QUIET_SIDE, 0, 0.33)
    early = by_band(early, edges_hz, levels_db) + hum(HUM_FIRST)
    late = by_band(late, edges_hz, levels_db) + hum(HUM_SECOND)
    return np.where(first, early, late) * np.clip(abs(T - SCENE_CHANGE_S) / CHANGE_FADE_S, 0, 1)


def scene():
    near = grinder() + twists() + handling_blows() + squeals()
    return near + rack_gain(KITCHEN_DB) * kitchen(near) + background()


def top_cut(x):
    return signal.sosfilt(signal.butter(12, 16310, fs=SR, output="sos"), x)


def record(dry):
    high_pass = signal.butter(6, TOP_HZ, "high", fs=SR, output="sos")
    top = signal.sosfiltfilt(high_pass, dry.mean(0))
    top_db = 10 * np.log10(uniform_filter1d(top ** 2, size=400) + 1e-14)
    shut = uniform_filter1d(1. * (top_db + 5 * drift(16) < TOP_GATE_DB), size=256)
    low_pass = signal.cheby2(12, 60, CUTOFF_HZ * 1.01, fs=SR, output="sos")
    mix = signal.sosfilt(low_pass, dry - shut * top)
    return top_cut(mix)


dry = scene()
out = record(dry)
inscribe(out)
```